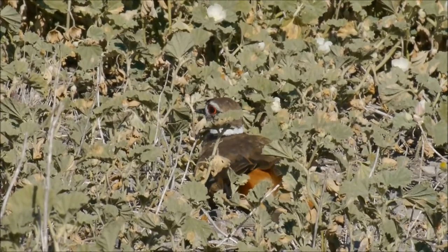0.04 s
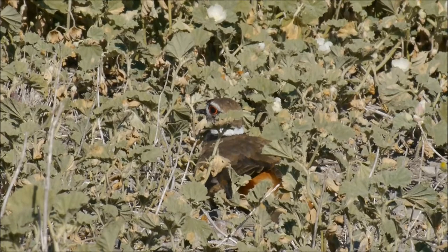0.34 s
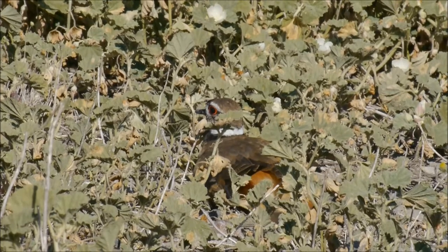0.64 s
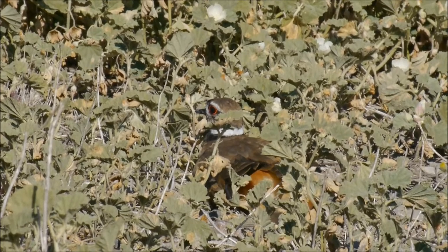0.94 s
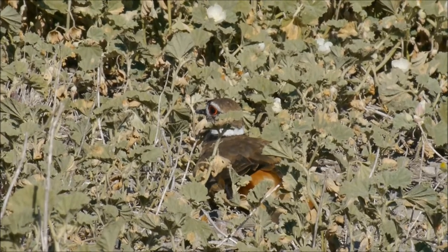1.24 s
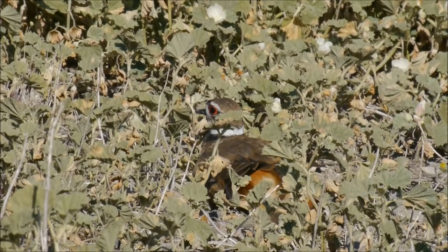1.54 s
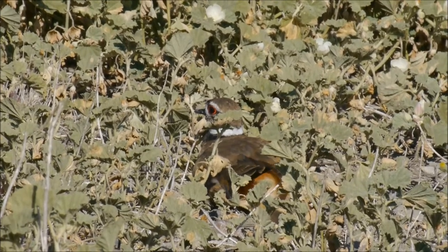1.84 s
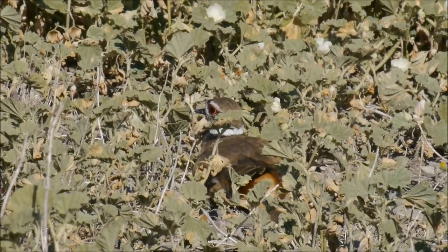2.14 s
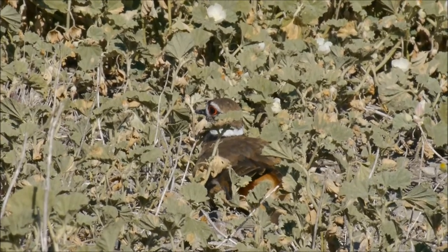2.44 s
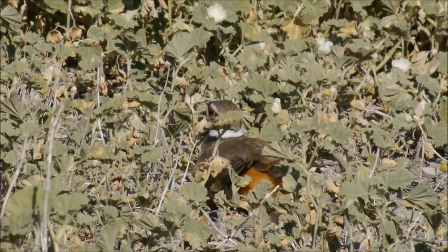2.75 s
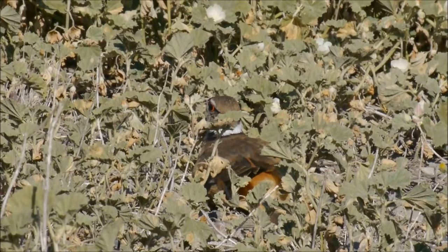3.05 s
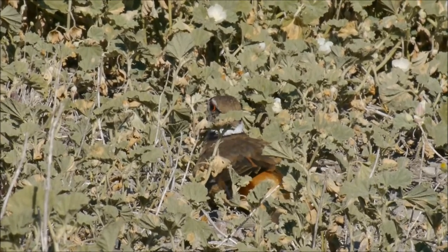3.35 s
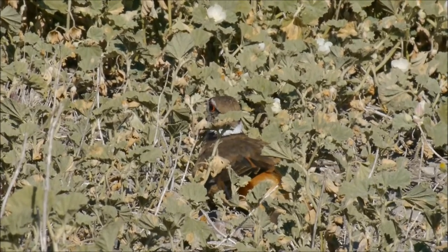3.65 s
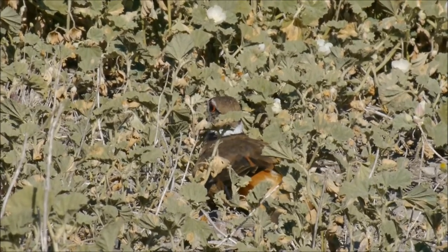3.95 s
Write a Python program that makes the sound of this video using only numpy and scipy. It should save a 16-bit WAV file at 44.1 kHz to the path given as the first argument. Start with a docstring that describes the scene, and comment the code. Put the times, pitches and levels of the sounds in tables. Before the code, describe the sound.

A killdeer pipes three short, clear whistles, at about 0.9, 1.4 and 1.5 seconds, with a faint outdoor echo. Smaller birds farther off chatter in quick runs of high, falling chirps for all four seconds, clearest around 3.2 seconds. Low wind buffets the microphone over a steady distant rush, gusting most near 2.7 seconds. Dry leaves give a few tiny, faint rustles, mostly around 3 seconds.

```python
"""Killdeer on open ground

A killdeer pipes three short calls: a low lead-in, a jump to an arched whistle, a sudden drop.
Small birds farther off chatter in runs of quick downward chirps, and the field returns a faint echo.
Underneath, dry leaves rustle and wind buffets the microphone over a steady distant rush."""
import sys
import numpy as np
from scipy import signal
from scipy.fft import rfft, irfft
from scipy.io import wavfile
from scipy.ndimage import uniform_filter1d

SR = 44100
rng = np.random.default_rng(int(sys.argv[2]) if len(sys.argv) > 2 else 0)


def put_to_file(sound):
    """Save the sound as 16-bit audio at rate SR, in the file named by the first command-line argument."""
    columns = np.atleast_2d(sound).T  # one column per channel
    safe = np.clip(columns, -1, 1)
    whole_steps = np.round(safe * 32767)
    wavfile.write(sys.argv[1], SR, whole_steps.astype(np.int16))


N = 176400
T = np.arange(N) / SR
CHIRP_WAVER = 0.025  # unsteadiness of the small birds, as a share of their pitch


def undb(db):
    """Decibels to linear gain."""
    return 10 ** (np.asarray(db) / 20)


def noise(points):
    """Noise of rms 1, coloured by a curve of (Hz, dB) points."""
    hz, db = np.array(points, float).T
    freqs = np.maximum(np.fft.rfftfreq(N, 1 / SR), 1)
    colour = undb(np.interp(np.log(freqs), np.log(hz), db))
    y = irfft(rfft(rng.standard_normal(N)) * colour, N)
    return y / y.std()


def walk(rate):
    """Smooth random drift with a spread near 1, taking `rate` steps a second."""
    step = max(int(SR / rate), 2)
    return uniform_filter1d(np.repeat(rng.standard_normal(N // step + 1), step), step)[:N]


def turn(hz):
    """Phase of an oscillator that follows a pitch curve."""
    return 2 * np.pi * np.cumsum(hz) / SR


def around(moment, reach):
    """Samples within `reach` seconds of a moment, and their times from it."""
    i = np.flatnonzero(np.abs(T - moment) < reach)
    return i, T[i] - moment


def swell(u):
    """Rounded fade in and out as u runs from -.5 to .5."""
    return np.cos(np.pi * np.clip(u, -.5, .5))


def wind():
    """Gusts rumble on the microphone; the distant rush stays nearly even."""
    # The rise and fall of the gusts. Each row: time in seconds, level in dB.
    gusts = [(0, -33.5), (.1, -35.5), (.15, -26), (.22, -33), (.6, -39), (1.05, -37.5), (1.57, -36),
             (1.66, -29), (1.98, -27.5), (2.07, -36.5), (2.47, -34.5), (2.56, -26.5), (2.66, -22),
             (2.85, -33.5), (3.02, -37.5), (3.35, -27), (3.72, -33.5), (3.87, -26.5)]
    # The deep tone of the buffeting. Each row: frequency in Hz, relative level in dB.
    buffet_colour = [(10, 0.5), (22, -0.5), (33, -1), (50, -6), (100, -12), (170, -21.5), (300, -31),
                     (700, -42.5), (2000, -60), (16000, -120)]
    # The broader tone of the rush. Each row: frequency in Hz, relative level in dB.
    rush_colour = [(20, -4), (100, 11), (200, 2), (320, -0.5), (500, -2), (850, -2), (1300, -7),
                   (2000, -17), (2800, -21), (4200, -21), (5500, -28), (7000, -29), (10000, -33.5),
                   (15500, -39.5)]
    buffet = noise(buffet_colour) * undb(np.interp(T, *np.array(gusts).T) + 1.96 * walk(9.9))
    rush = noise(rush_colour) * undb(-45 + .5 * walk(3.28))
    return buffet + rush


def rustles():
    """Dry leaves scrape in the weeds: brief, grainy puffs of noise."""
    # The scrapes. Each row: peak time in seconds, width in seconds, band centre in Hz, level in dB.
    scrapes = [(.75, .007, 5230, -57), (2.913, 0.0045, 2280, -52), (3.015, .003, 10000, -67),
               (3.104, 0.015, 6140, -58.5), (3.851, 0.0046, 8300, -59.5)]
    # The band of a scrape. Each row: multiple of the centre frequency, relative level in dB.
    colour = [(.25, -40), (.7, -13), (1, 0), (1.4, -17), (2, -32), (4, -50)]
    out = np.zeros(N)
    for peak, width, hz, db in scrapes:
        grain = undb(db + 2.6 * walk(600))
        envelope = np.exp(-((T - peak) / width) ** 2 / 2)
        out += grain * envelope * noise([(hz * ratio, band_db) for ratio, band_db in colour])
    return out


def field_echo(sound, build_s, t60_s=0.49):
    """Plants and ground scatter the sound into a diffuse tail of unit energy."""
    t = T[:SR]
    tail = rng.standard_normal(SR) * undb(-60 * t / t60_s) * (1 - np.exp(-t / build_s))
    return signal.fftconvolve(sound, tail / np.linalg.norm(tail))[:N]


def chirp(centre, hz, fall, db, waver):
    """One chirp falling about `fall` Hz per ms, steep at first and easing in the middle."""
    # The strength of a small bird's voice across its range. Each row: pitch in Hz, gain in dB.
    voice = [(2500, -24), (3400, 4.5), (4100, -2.5), (5600, -1.5), (6200, -2), (6800, -14), (8000, -11)]
    width = .0038 * (80 / fall) ** .33  # seconds; fast sweeps are shorter
    i, t = around(centre, 2.8 * width)
    u = t / width
    bend = 1 - .11 * np.exp(-u ** 2) + .08 * np.minimum(u, 0) ** 2
    pitch = (hz - fall * 1000 * t * bend) * waver[i]
    envelope = np.exp(-u ** 2 / 2) * undb(db + np.interp(pitch, *np.array(voice).T))
    return i, envelope * signal.windows.tukey(len(i), .2) * np.sin(turn(pitch))


def flock(chirps_per_s=43):
    """A bed of barely heard chirps from all over the field."""
    out, waver = np.zeros(N), 1 + CHIRP_WAVER * walk(500)
    beats = np.arange(0, T[-1], 1 / chirps_per_s)
    for beat, (late, high, steep, loud) in zip(beats, rng.standard_normal((600, 4))):
        i, note = chirp(beat + .004 * late, hz=4340 * (1 + .11 * high),
                        fall=63 * np.exp(.4 * steep), db=-72.5 + 3 * loud, waver=waver)
        out[i] += note
    return out


def distant_birds():
    """Faraway birds slur single soft whistles."""
    # The slurs. Each row: midpoint and length in seconds, start and end pitch in Hz, level in dB.
    slurs = [(0.772, .016, 1800, 1540, -48.5), (1.033, 0.041, 3550, 3650, -57.5),
             (1.21, .02, 2100, 1990, -52.5), (1.227, 0.013, 1950, 1480, -45.5),
             (1.97, 0.045, 3300, 2880, -55), (2.698, 0.023, 3650, 3420, -57.5),
             (2.985, 0.057, 4230, 4080, -54), (3.317, 0.031, 3180, 2940, -60),
             (3.875, .105, 2850, 2940, -58.5)]
    out, waver = np.zeros(N), 1 + 0.01 * walk(400)
    for centre, length, start_hz, end_hz, db in slurs:
        i, t = around(centre, length / 2)
        pitch = np.linspace(start_hz, end_hz, len(i)) * waver[i]
        out[i] += undb(db) * swell(t / length) ** .5 * np.sin(turn(pitch))
    return out


def chatter(gap_s=.01):
    """Two or three small birds overlap, their clear chirps standing out of uneven runs of softer ones."""
    # The clear chirps. Each row: midpoint in seconds, pitch in Hz, fall in Hz per ms, base level in dB.
    clear_chirps = [(0.0249, 4850, 60, -45), (0.0347, 4450, 45, -48.5), (0.0484, 5400, 180, -43.5),
                    (0.0878, 4150, 30, -48), (0.1008, 5050, 60, -43.5), (0.1088, 4550, 60, -45),
                    (0.1159, 4150, 30, -47), (0.187, 4650, 60, -47), (0.195, 4500, 20, -50),
                    (0.2728, 4100, 60, -52), (0.3512, 4850, 60, -45), (0.3616, 4500, 105, -49),
                    (0.3761, 4900, 175, -42.5), (0.415, 4700, 68, -44), (0.424, 4500, 97, -44.5),
                    (0.438, 5000, 135, -42), (0.4963, 4500, 80, -45.5), (0.521, 4550, 80, -49),
                    (0.631, 5050, 230, -42), (0.641, 5350, 230, -46), (0.6605, 4750, 135, -45),
                    (0.6717, 4950, 175, -39.5), (0.6804, 4250, 20, -46), (0.6943, 4200, 105, -41.5),
                    (0.7088, 4100, 80, -47.5), (0.7453, 4500, 230, -47.5), (1.182, 4350, 80, -45.5),
                    (1.1923, 4150, 175, -54), (1.2322, 3850, 135, -54), (1.247, 4250, 45, -46.5),
                    (1.3115, 4800, 60, -43.5), (1.325, 4550, 105, -41), (1.3359, 4950, 175, -41.5),
                    (1.377, 4750, 80, -40.5), (1.3887, 4450, 89, -45), (1.4048, 4550, 60, -39),
                    (1.4614, 4450, 60, -49), (1.589, 4150, 80, -47), (1.613, 4350, 20, -47),
                    (1.632, 4250, 20, -44.5), (1.6429, 4150, 60, -45), (1.6582, 4250, 60, -45.5),
                    (1.6685, 4150, 80, -52), (1.796, 4200, 175, -48), (1.811, 4550, 105, -40.5),
                    (1.8235, 4250, 135, -46), (1.8612, 4050, 105, -47), (1.8817, 4250, 60, -43.5),
                    (1.8922, 4000, 105, -47.5), (1.909, 4650, 175, -43), (1.9235, 4500, 135, -50),
                    (1.9685, 4400, 175, -50), (2.2827, 4650, 80, -46), (2.293, 4450, 135, -47),
                    (2.3065, 4900, 175, -45), (2.3463, 4600, 80, -39), (2.3556, 4400, 80, -44),
                    (2.3716, 4550, 80, -43), (2.4284, 4400, 65, -49), (2.452, 4500, 105, -50),
                    (2.6165, 4600, 20, -50), (2.628, 4450, 60, -49), (2.8639, 4700, 175, -43.5),
                    (2.8726, 5750, 200, -43), (2.8824, 4350, 230, -45), (2.9054, 4100, 230, -47),
                    (2.9158, 4150, 135, -42.5), (2.9316, 4350, 230, -44), (2.9448, 4600, 60, -41.5),
                    (3.0034, 5250, 105, -48.5), (3.153, 4100, 105, -43), (3.1658, 4100, 80, -39),
                    (3.1783, 4100, 230, -41), (3.1933, 4300, 60, -38.5), (3.2046, 4300, 80, -37.5),
                    (3.2176, 4250, 80, -34.5), (3.2326, 4200, 60, -39.5), (3.5605, 4650, 200, -42),
                    (3.5722, 5450, 230, -39), (3.5843, 5250, 230, -40), (3.6045, 4700, 60, -47),
                    (3.6176, 5100, 175, -39), (3.6332, 5200, 230, -40.5), (3.6583, 4150, 20, -52),
                    (3.676, 5050, 175, -46.5), (3.786, 4900, 74, -44), (3.795, 4700, 20, -47),
                    (3.8043, 4300, 45, -45.5), (3.8426, 4150, 21, -45), (3.8567, 4650, 20, -39.5),
                    (3.8697, 4400, 45, -64), (3.9585, 4200, 80, -51)]
    # The soft runs. Each row: start and end in seconds, then the values their chirps scatter around:
    # pitch in Hz, fall in Hz per ms, base level in dB.
    runs = [(0.081, 0.132, 4070, 60.1, -49.5), (0.157, 0.293, 4290, 59.8, -54),
            (0.437, .53, 4380, 79.8, -60.5), (0.614, 0.725, 4410, 165, -49.5),
            (1.166, 1.288, 4090, 95, -56), (1.279, 1.495, 4510, 121.4, -53.5),
            (1.568, 1.684, 4200, 81, -52.5), (1.843, 1.98, 4500, 131, -54), (2.44, 2.53, 4250, 90.8, -57.5),
            (2.542, 2.64, 4460, 34.7, -57), (2.853, 2.956, 5070, 174, -47.5), (2.978, 3.06, 4800, 141, -56),
            (3.464, 3.679, 4750, 131, -55.5), (3.946, 4.025, 4280, 100, -50.5),
            (0.976, 1.03, 4200, 129, -58.5), (1.998, 2.055, 4700, 121, -63), (2.214, 2.24, 4220, 91, -63),
            (3.365, 3.41, 4650, 55, -60), (.4, .52, 6900, 251, -54), (1.283, 1.32, 7300, 250, -48.5),
            (2.327, 2.46, 6950, 248, -54)]
    out, waver = np.zeros(N), 1 + CHIRP_WAVER * walk(500)
    notes = [(centre, hz, fall, db + .5) for centre, hz, fall, db in clear_chirps]
    clear_times = np.array(clear_chirps)[:, 0]
    for (start, end, hz, fall, db), scatter in zip(runs, rng.standard_normal((len(runs), 40, 4))):
        for beat, (late, high, steep, loud) in zip(np.arange(start, end, gap_s), scatter):
            if np.abs(clear_times - beat).min() > gap_s / 2:  # leave room for the clear chirps
                notes.append((beat + .0025 * late, hz * (1 + .059 * high),
                              fall * np.exp(.4 * steep), db + 4 * loud))
    for settings in notes:
        i, note = chirp(*settings, waver)
        out[i] += note
    return out


def killdeer(lead_s=0.017, lead_glide=0.19):
    """A rising lead-in, hoarse when it carries an undertone, breaks into an arched whistle."""
    # The calls. Each row: jump time and whistle length in seconds, top pitch in Hz, tilt as a share of
    # pitch, level and mid-whistle dip in dB, lead-in pitch in Hz, lead-in and undertone levels in dB.
    calls = [(.879, .024, 3170, 0, -28, 0, 2230, -28, -65),
             (1.360, .0215, 3160, -.01, -29, 0, 2210, -28, -65),
             (1.483, .041, 3320, .04, -29, 6, 2400, -42, -35)]
    # The arch of every whistle. Each row: share of its length, share of the top pitch, gain in dB.
    arch = [(-.06, .76, -25), (.02, .93, -6), (.11, .985, 0), (.35, 1, 0), (.6, .995, -.5),
            (.8, .965, -1.5), (.94, .9, -3), (1.04, .67, -13), (1.2, .52, -18), (1.4, .46, -45)]
    # The whistle's brightness: harmonics 2 and 3, in dB against the call's level.
    overtone_db = [-12.5, -40]
    out, waver, flutter = np.zeros(N), 1 + .0053 * walk(900), undb(0.88 * walk(350))
    arch_time, arch_pitch, arch_db = np.array(arch).T
    for jump, length, top_hz, tilt, db, dip_db, lead_hz, lead_db, under_db in calls:
        i, t = around(jump, 2 * length)
        u = t / length
        phase = turn(top_hz * np.interp(u, arch_time, arch_pitch) * (1 + tilt * (u - .5)) * waver[i])
        envelope = undb(np.interp(u, arch_time, arch_db)) * (u > arch_time[0]) * (u < arch_time[-1])
        fundamental = undb(-dip_db * swell((u - .62) / 0.65) ** 2) * np.sin(phase)
        overtones = sum(undb(level) * np.sin(k * phase) for k, level in enumerate(overtone_db, 2))
        out[i] += undb(db) * envelope * (fundamental + envelope * overtones)  # brighter as it swells

        i, t = around(jump - .0075, lead_s / 2)  # the lead-in sits just ahead of the jump
        u = t / lead_s
        phase = turn(lead_hz * (1 + lead_glide * u) * waver[i])
        out[i] += swell(u) ** 2 * undb(lead_db) * (np.sin(phase) + undb(-29) * np.sin(2 * phase))
        out[i] += swell(u) * undb(under_db) * np.sin(phase / 3)  # undertone at a third of the pitch
    return out * flutter


def scene():
    """The killdeer up front, the small birds behind it, and their echoes over leaves and wind."""
    near = killdeer()
    far = chatter() + flock() + distant_birds()
    # Low plants throw back little of the killdeer's lower notes.
    scattered = signal.sosfilt(signal.butter(3, 2560, "high", fs=SR, output="sos"), near)
    near_echo = undb(-16) * field_echo(scattered, build_s=0.014)
    far_echo = undb(-13.5) * field_echo(far, build_s=0.0011)
    return (near + far + near_echo + far_echo + rustles() + wind())[None]


def record(dry):
    """A steep low-pass trims the air above 15.7 kHz."""
    return signal.sosfilt(signal.ellip(10, .1, 80, 15700, fs=SR, output="sos"), dry)


dry = scene()
out = record(dry)
put_to_file(out)
```